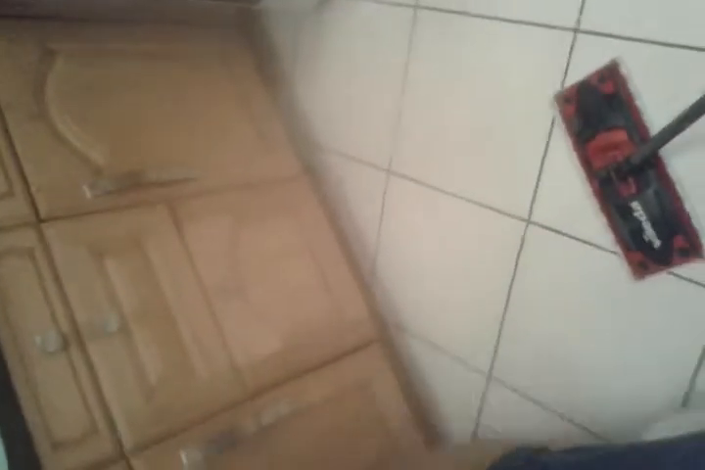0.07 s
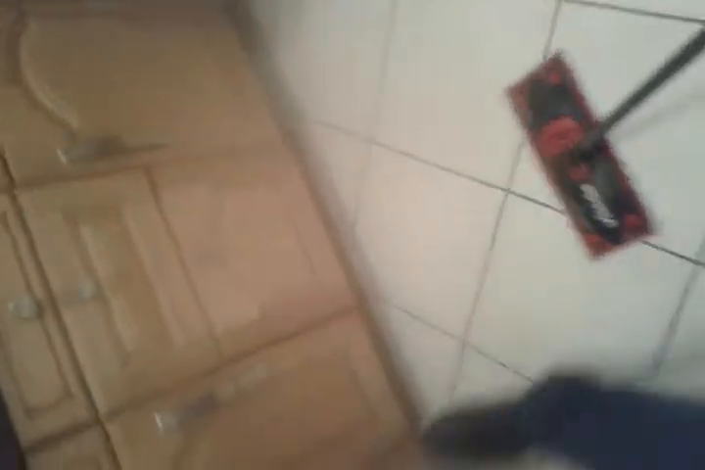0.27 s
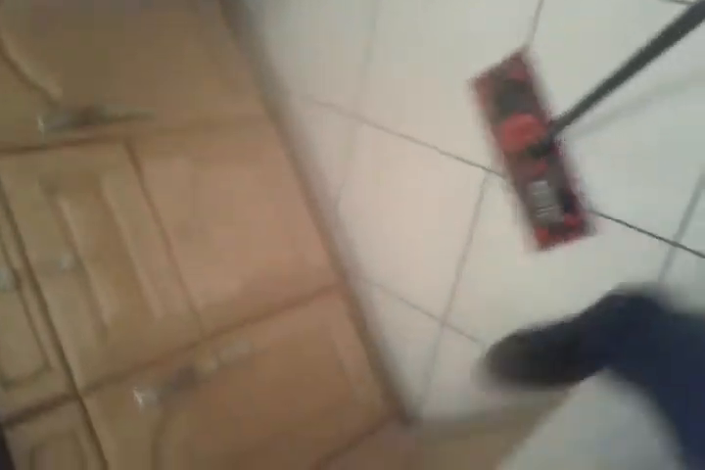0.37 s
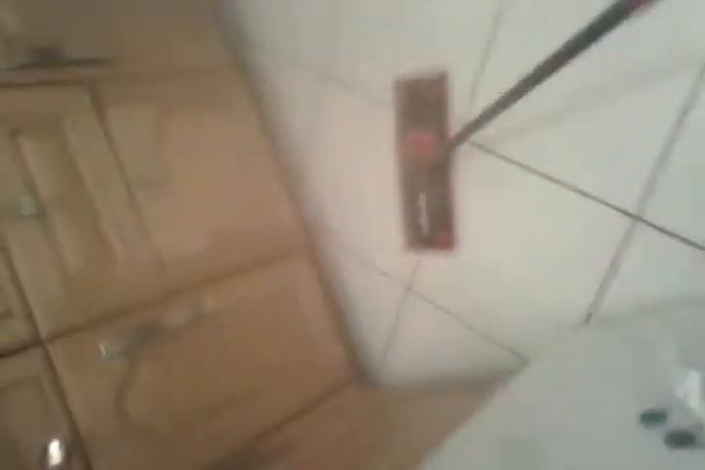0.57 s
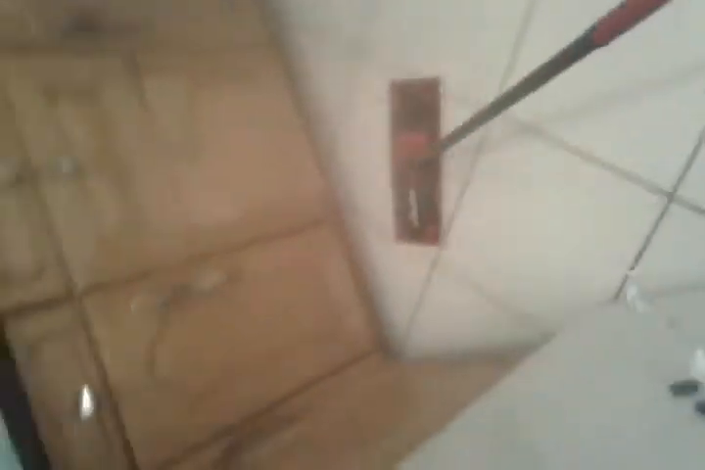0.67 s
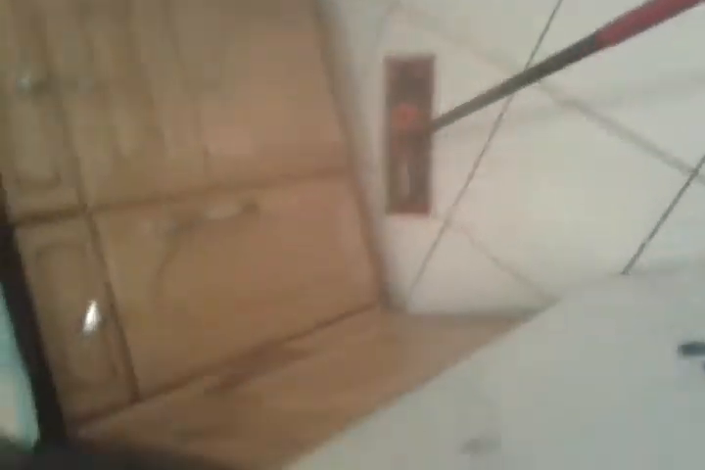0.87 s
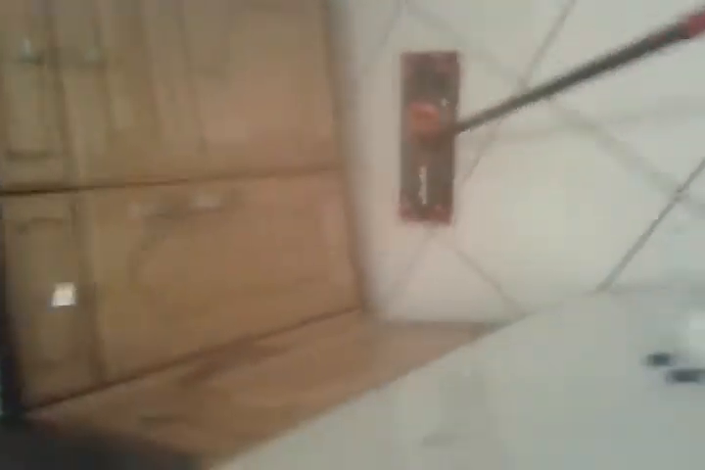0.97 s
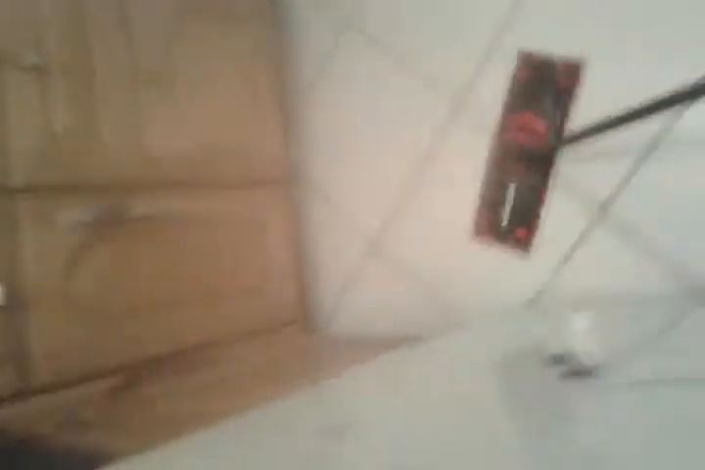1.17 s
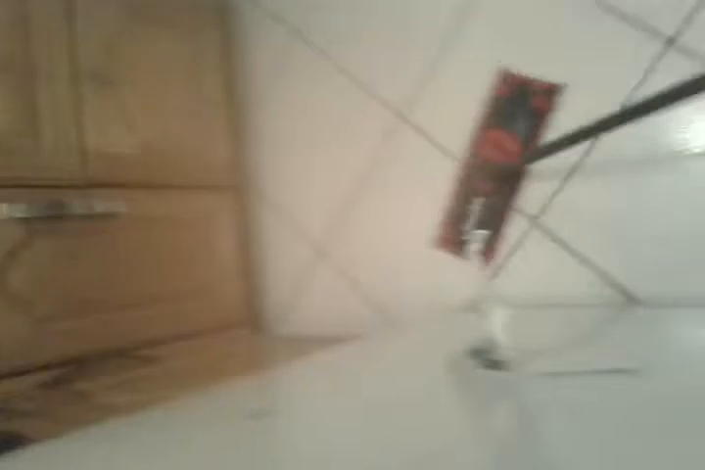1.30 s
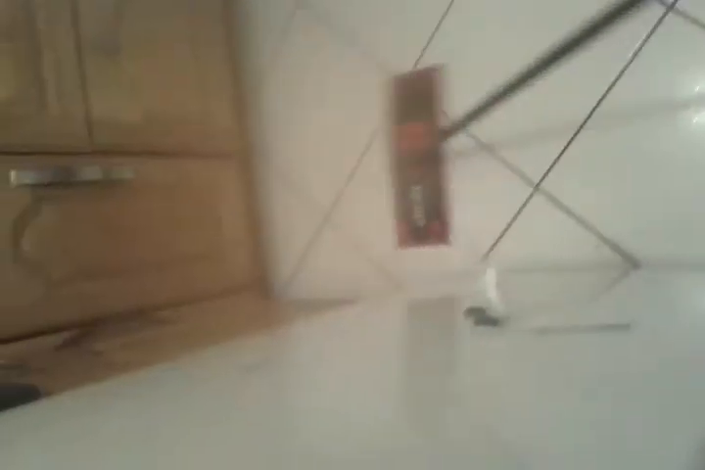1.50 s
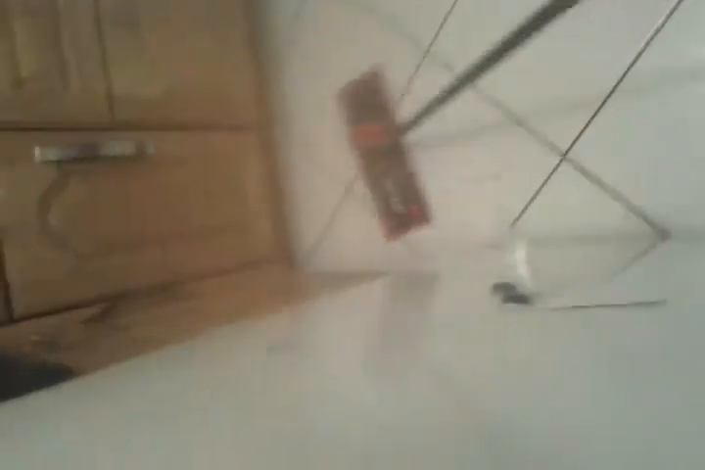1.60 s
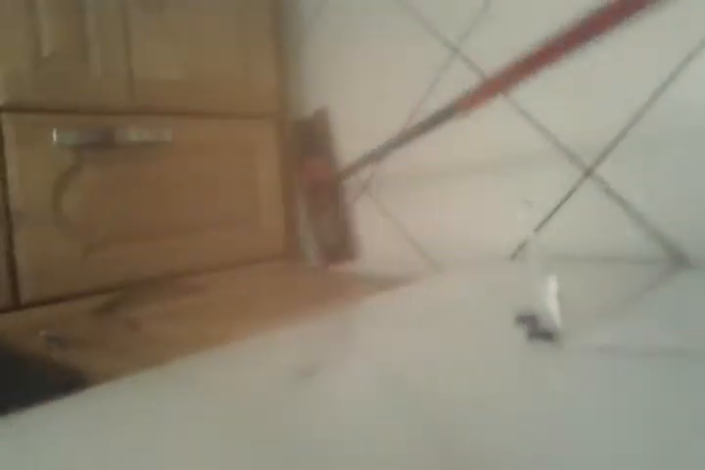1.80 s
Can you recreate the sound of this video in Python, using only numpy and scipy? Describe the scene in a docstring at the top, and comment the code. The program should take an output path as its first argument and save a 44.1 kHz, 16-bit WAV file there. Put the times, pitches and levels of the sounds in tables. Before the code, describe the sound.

A mop knocks loudly once in a tiled kitchen, followed by dull close bumps.

```python
"""In a tiled kitchen a flat mop knocks once, loudly, against the floor or a wooden cabinet. The impact
excites the damped modes of mop and cabinet, and the room reverberates. Weaker, dull and dry knocks,
stick-slip rubs and small ticks sound close by, probably from the hand that holds the microphone.
Near the end the mop scuffs over the tiles; a low handling rumble and a faint hiss lie under it all."""
import sys
import numpy as np
from scipy import signal
from scipy.fft import rfft, irfft
from scipy.io import wavfile

SR = 44100
rng = np.random.default_rng(int(sys.argv[2]) if len(sys.argv) > 2 else 0)


def int16_out(signal):
    """Quantize to a 16-bit WAV file."""
    q = np.round(np.clip(np.atleast_2d(signal).T, -1, 1) * 32767)
    wavfile.write(sys.argv[1], SR, q.astype(np.int16))


N = 81585
T = np.arange(N) / SR

# The mop head lands and rattles. Each row: start in seconds, clack gain in dB, thud gain in dB,
# low-pass edge of the contact in Hz.
MOP_CONTACTS = [(0.2468, 3.5, 0, 5880), (0.252, -9.5, -4, 9300), (0.2683, -6.5, -2.5, 3945),
                (0.2896, -11, -6.5, 2850), (0.3038, -5, -7, 2020), (.377, -5, -18, 1520)]
# Modes of mop and cabinet. Each row: frequency in Hz, level in dB, 60 dB decay time in seconds.
MOP_AND_CABINET_MODES = [(131.6, -12.5, 0.086), (178.4, -16, 0.071), (128.4, -23, 0.88), (404, -36.5, 1),
                         (450, -30.5, 0.75), (970, -32.5, 0.34), (1110, -52, 0.29), (1226, -42, 0.31),
                         (1358, -42.5, 0.61), (1432, -52, 1), (1593, -37.5, 0.39), (1997, -37, 0.3),
                         (2238, -31.5, 0.16)]
CLACK_GAIN_DB, CRACK_GAIN_DB = -28, -22

def mop_knock():
    """Impact excites damped modes: each contact thuds and clacks, and the first also cracks and rings."""
    modes = [from_db(db) * np.sin(2 * np.pi * hz * T) * decay(t60)
             for hz, db, t60 in MOP_AND_CABINET_MODES]
    thud = butter(modes[0] + modes[1], 2000, "low")   # the two shortest modes
    ring = sum(mode * (-1) ** k for k, mode in enumerate(modes[2:]))   # alternating polarity
    clack = from_db(CLACK_GAIN_DB) * room_clack()
    # The first touch of the plastic frame arrives as direct sound.
    crack = rms_one(butter(rng.standard_normal(N), [940, 2360], "band")) * decay(t60=0.015)
    crack = from_db(CRACK_GAIN_DB) * butter(crack, 2360, "low")
    out = np.zeros(N)
    add(out, MOP_CONTACTS[0][0], ring + crack)
    for start, clack_db, thud_db, edge_hz in MOP_CONTACTS:
        contact = from_db(clack_db) * clack + from_db(thud_db) * thud
        add(out, start, butter(contact, edge_hz, "low"))
    return butter(out, 76.5, "high")


# The clack as the room returns it. Each row: frequency in Hz, relative spectral density in dB.
CLACK_SPECTRUM = [(45, -36), (95, -0.5), (170, 3.5), (340, -3), (650, -5.5), (1300, -11.5), (2450, -21),
                  (3300, -33.5), (4800, -40), (8000, -35.5), (10000, -39), (13000, -38)]
# Reverberation of the kitchen. Each row: frequency in Hz, 60 dB decay time in seconds.
KITCHEN_T60 = [(80, 1), (250, 0.6), (600, 0.51), (1400, 0.48), (2500, 0.57), (6000, 0.59), (13000, 0.98)]
EARLY_DB, EARLY_T60_S = -4, 0.11   # early reflections, relative to the tail

def room_clack():
    """Reverberation as noise bands: early reflections, then a tail that dies soonest in the midrange."""
    edges = np.geomspace(28, 16000, 23)
    white = rng.standard_normal((2, N + SR))   # a spare second lets the filters settle
    early = from_db(EARLY_DB) * decay(EARLY_T60_S)
    out = np.zeros(N)
    for k, (low, high) in enumerate(zip(edges, edges[1:])):
        centre_hz = np.sqrt(low * high)
        envelope = early + decay(at_hz(KITCHEN_T60, centre_hz))
        band = butter(white[k % 2], [low, high], "band")[SR:] * envelope
        density = from_db(at_hz(CLACK_SPECTRUM, centre_hz))
        out += rms_one(band) * density * np.sqrt(np.mean(envelope ** 2) * (high - low))
    total_power = np.sum(np.diff(edges) * from_db(at_hz(CLACK_SPECTRUM, edges[1:])) ** 2)
    return out / np.sqrt(total_power)


# Dull knocks on the microphone casing. Each row: time in seconds, peak level in dB,
# body resonance in Hz, low-pass edge of the contact in Hz.
CASING_KNOCKS = [(0.042, -30, 161, 336), (0.048, -31, 150, 224), (0.055, -27.5, 142, 495),
                 (0.078, -37, 122, 290), (0.5294, -21, 120, 228), (0.5712, -22.5, 173, 428),
                 (0.5771, -30, 203, 444), (0.583, -26, 157, 323), (0.594, -28, 94, 330),
                 (0.63, -27.5, 175, 300), (0.6495, -23.5, 178, 147), (0.693, -31.5, 170, 220),
                 (0.733, -33.5, 170, 248), (0.743, -40, 260, 1000), (0.773, -25, 148, 430),
                 (0.7929, -9, 194, 219), (0.837, -21.5, 103, 302), (.875, -23.5, 165, 153),
                 (0.906, -8, 186, 306), (0.9064, -26.5, 1050, 1450), (0.9275, -22, 162, 330),
                 (1.032, -17.5, 77, 198), (1.048, -10.5, 212, 704), (1.09, -14.5, 206, 506),
                 (1.0936, -15.5, 250, 557), (1.0959, -17.5, 98, 338), (1.1107, -17, 193, 546),
                 (1.2481, -25.5, 154, 141), (1.2769, -9.5, 156, 1160), (1.442, -37, 114, 560),
                 (1.489, -34, 123, 384), (1.587, -32.5, 241, 396), (1.689, -26.5, 87, 1010),
                 (1.7939, -26, 172, 545), (1.805, -28, 119, 400)]
BODY_Q, Q_LOSS_PER_DB = 1.18, 0.0249   # Q for a 0 dB knock; lighter taps have a higher Q
PUSH_CYCLES = 0.057   # Gaussian width of a push, in periods of its edge frequency

def close_knocks():
    """Pulse excitation: a shorter contact has a wider spectrum, and a firmer push damps the body more."""
    out = np.zeros(N)
    for time, db, body_hz, edge_hz in CASING_KNOCKS:
        push = -np.exp(-.5 * ((T - time) * edge_hz / PUSH_CYCLES) ** 2) + 1e-18
        knock = casing(push, body_hz, edge_hz, q=BODY_Q - Q_LOSS_PER_DB * db)
        out += from_db(db) * knock / np.abs(knock).max()
    return out


def casing(force, body_hz, edge_hz, q):
    """Forced response of a heavily damped body: one broad resonance between two filter slopes."""
    b, a = signal.iirpeak(body_hz, max(q, .3), fs=SR)
    resonance = signal.lfilter(b, a, force)
    softened = butter(resonance, edge_hz, "low")
    return butter(softened, 38.6, "high")


# Rubs on the casing. Each row: start in seconds, length in seconds, rms level in dB,
# body resonance in Hz, low-pass edge in Hz.
CASING_RUBS = [(0.573, 0.037, -32.5, 117, 660), (0.793, 0.051, -29.5, 133, 815),
               (0.903, 0.021, -25.5, 61, 257), (0.957, 0.047, -48, 83.5, 760),
               (1.036, 0.03, -26.5, 96, 535), (1.085, 0.037, -25, 112, 800), (1.15, 0.033, -40, 188, 1180),
               (1.261, 0.038, -30.5, 82, 790), (1.321, 0.08, -50, 76, 610), (1.422, .038, -40.5, 88, 550),
               (1.482, 0.038, -41.5, 109, 800), (1.578, 0.023, -38.5, 65, 407),
               (1.699, 0.048, -51.5, 85, 790), (1.792, 0.028, -39, 195, 624)]
RUB_RISE, RUB_FALL = 0.11, 0.38   # shares of the length
SLIP_SPREAD_DB, RUB_HISS_DB = 6, -43

def close_rubs():
    """Stick-slip friction: runs of uneven slips drive the casing and add a trace of hiss."""
    out, count = np.zeros(N), SR // 10
    for start, length, db, body_hz, edge_hz in CASING_RUBS:
        slips = rng.standard_normal(count) * from_db(SLIP_SPREAD_DB * rng.standard_normal(count))
        progress = T[:count] / length
        envelope = np.clip(np.minimum(progress / RUB_RISE, (1 - progress) / RUB_FALL), 0, 1)
        force = slips * envelope
        body = rms_one(casing(force, body_hz, edge_hz, q=1))
        hiss = from_db(RUB_HISS_DB) * rms_one(force)
        rub = (body + hiss) / np.sqrt(progress[-1])   # unit rms over the rub's own length
        add(out, start, from_db(db) * rub)
    return out


# Small sharp ticks. Each row: start in seconds, peak level in dB, 60 dB decay time in seconds.
SHARP_TICKS = [(0.8073, -37, 0.018), (0.8102, -29.5, 0.0057), (1.0487, -44, 0.053), (1.091, -42, 0.069),
               (1.103, -37, 0.12), (1.159, -46.5, 0.15), (1.281, -42, 0.061)]
# Their colour. Each row: frequency in Hz, relative spectral density in dB.
TICK_SPECTRUM = [(500, 9.5), (1200, 3.5), (3000, -2), (7000, -11), (14000, -16.5)]

def ticks():
    """Broadband transients with exponential decay: little snaps, as of plastic under strain."""
    out = np.zeros(N)
    for start, db, t60 in SHARP_TICKS:
        snap = noise(TICK_SPECTRUM) * decay(t60)
        add(out, start, from_db(db) * snap / np.abs(snap).max())
    return out


# The mop pad on the tiles. Each row: frequency in Hz, relative spectral density in dB.
SCUFF_SPECTRUM = [(100, -13), (400, 9), (700, -2), (1300, -11.5), (2400, -23.5), (6000, -55), (14000, -43)]
SCUFF_START_S, SCUFF_RISE_S, SCUFF_HOLD_S, SCUFF_T60_S, SCUFF_DB = 1.646, 0.0074, 0.032, 0.33, -47

def mop_scuff():
    """Sliding friction makes a brief burst of noise, which decays exponentially in the room."""
    age = T - SCUFF_START_S
    rise = np.clip(age / SCUFF_RISE_S, 0, 1)
    fade = from_db(-60 * np.maximum(age - SCUFF_RISE_S - SCUFF_HOLD_S, 0) / SCUFF_T60_S)
    return from_db(SCUFF_DB) * rise * fade * noise(SCUFF_SPECTRUM)


# Rumble of the moving hand. Each row: time in seconds, rms level in dB.
RUMBLE_ENVELOPE = [(0, -43), (.1, -55.5), (.18, -62.5), (.45, -43.5), (.62, -36.5), (.85, -41.5),
                   (1.2, -43.5), (1.4, -47), (1.6, -56.5), (1.85, -45)]
# Its colour. Each row: frequency in Hz, relative spectral density in dB.
RUMBLE_SPECTRUM = [(20, 1), (45, 8), (85, 13), (180, 2), (320, -10.5), (600, -20.5), (3000, -40),
                   (14000, -81)]

def hand_rumble():
    """Structure-borne noise: a low rumble that swells and sinks as the hand moves."""
    return level(RUMBLE_ENVELOPE) * noise(RUMBLE_SPECTRUM)


# Background hiss. Each row: time in seconds, rms level in dB.
HISS_ENVELOPE = [(0, -66.5), (.19, -73), (.6, -63.5), (1.3, -64.5), (1.48, -65), (1.56, -69), (1.85, -67)]
# Its colour. Each row: frequency in Hz, relative spectral density in dB.
HISS_SPECTRUM = [(1000, 1), (2500, -0.44), (8000, -1.9), (9500, -1.2)]

def faint_hiss():
    """The noise floor: nearly white noise whose level drifts."""
    return level(HISS_ENVELOPE) * noise(HISS_SPECTRUM)


def from_db(db):
    """Amplitude ratio of a level in decibels."""
    return 10 ** (np.asarray(db) / 20)


def rms_one(x):
    """Normalisation to unit rms."""
    return x / np.sqrt(np.mean(x ** 2) + 1e-20)


def at_hz(points, hz):
    """Interpolation on a logarithmic frequency axis."""
    frequencies, values = np.transpose(points)
    return np.interp(np.log(np.maximum(hz, 1)), np.log(frequencies), values)


def level(points):
    """Amplitude envelope, interpolated in decibels over time."""
    return from_db(np.interp(T, *np.transpose(points)))


def decay(t60):
    """Exponential decay, by 60 dB in t60 seconds."""
    return np.exp(-np.log(1000) * np.minimum(T / t60, 10))


def noise(spectrum):
    """Spectral shaping of white noise, at unit rms."""
    gains = from_db(at_hz(spectrum, np.fft.rfftfreq(N, 1 / SR)))
    return rms_one(irfft(rfft(rng.standard_normal(N)) * gains, N))


def butter(x, hz, kind):
    """Maximally flat filter with slopes of 12 dB per octave."""
    return signal.sosfilt(signal.butter(2, hz, kind, fs=SR, output="sos"), x)


def add(out, start, sound):
    """Superposition of a sound delayed by start seconds."""
    i = int(start * SR)
    out[i:i + len(sound)] += sound[:N - i]


def scene():
    """Superposition: all sources sum at one microphone."""
    mix = mop_knock() + hand_rumble() + faint_hiss() + mop_scuff()
    mix += close_knocks() + ticks() + close_rubs()
    return mix[None]


CUTOFF_HZ = 14100

def record(dry):
    """Band limiting: a steep elliptic low-pass removes the highest treble."""
    return signal.sosfilt(signal.ellip(10, .2, 80, CUTOFF_HZ, fs=SR, output="sos"), dry)


dry = scene()
out = record(dry)
int16_out(out)
```